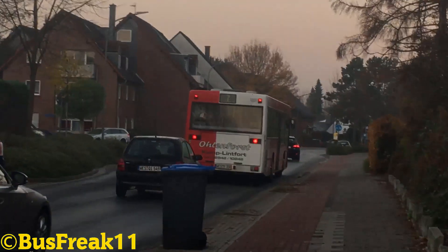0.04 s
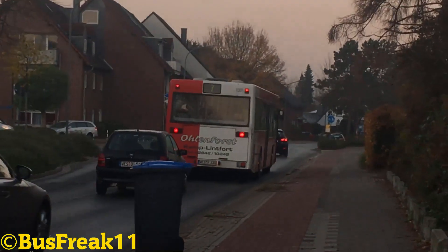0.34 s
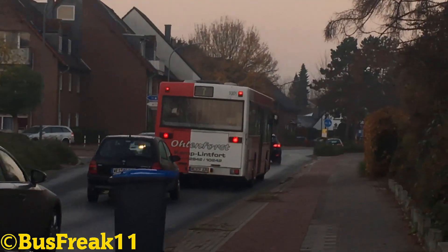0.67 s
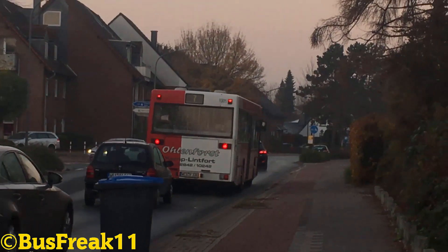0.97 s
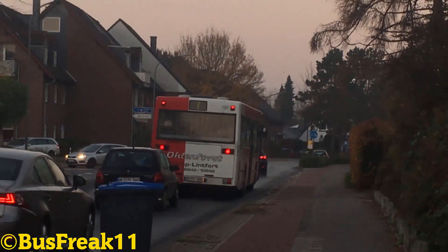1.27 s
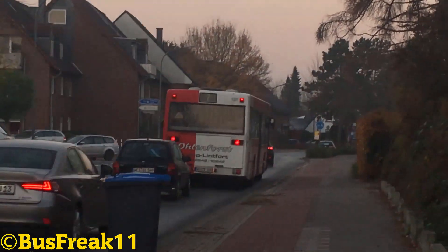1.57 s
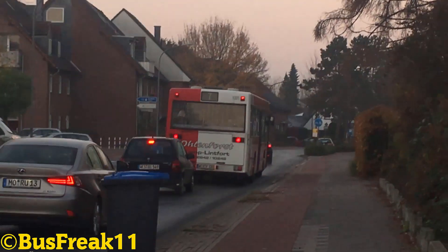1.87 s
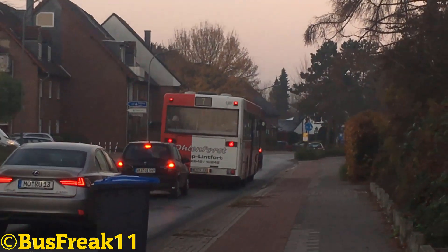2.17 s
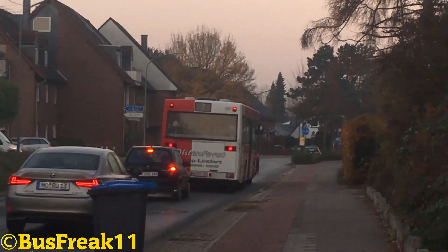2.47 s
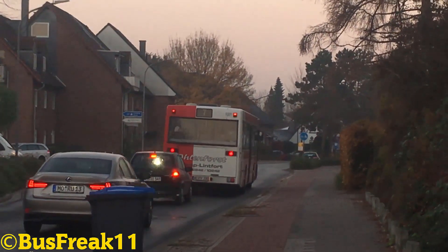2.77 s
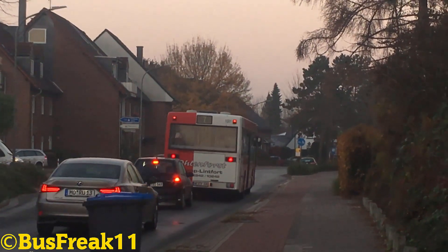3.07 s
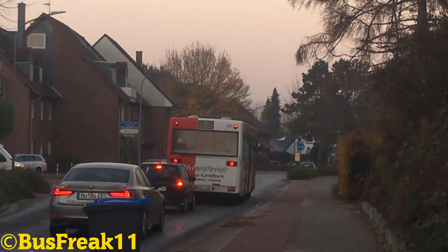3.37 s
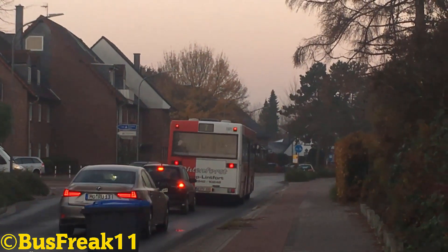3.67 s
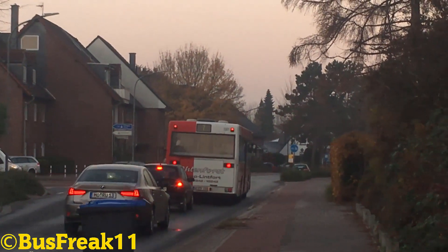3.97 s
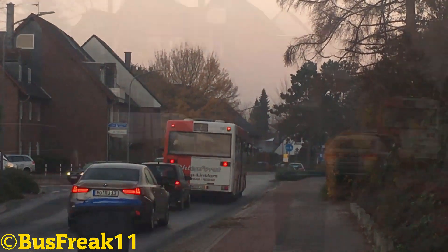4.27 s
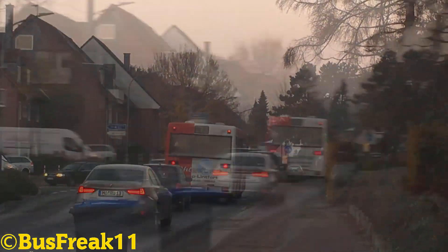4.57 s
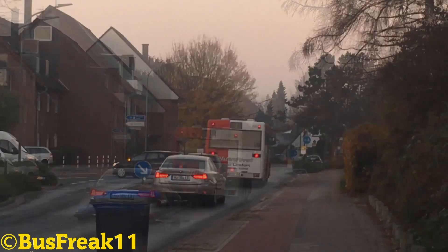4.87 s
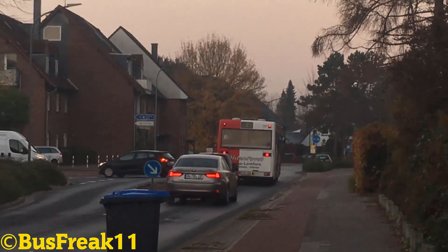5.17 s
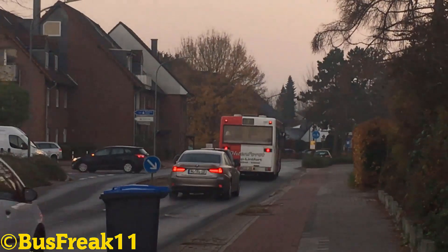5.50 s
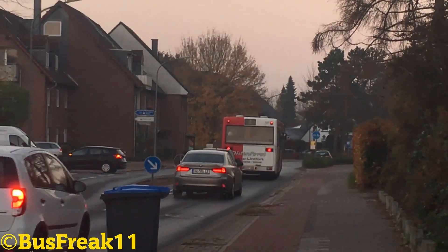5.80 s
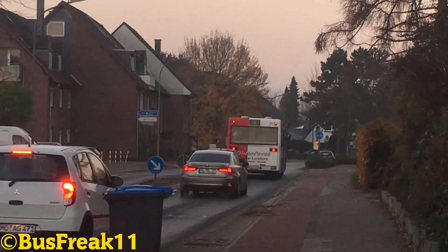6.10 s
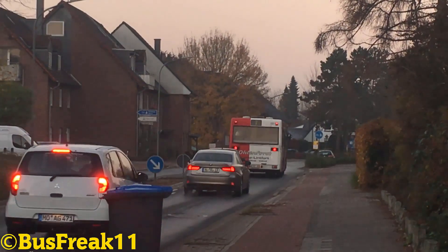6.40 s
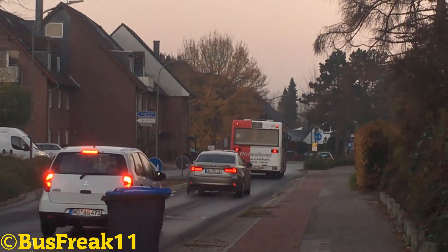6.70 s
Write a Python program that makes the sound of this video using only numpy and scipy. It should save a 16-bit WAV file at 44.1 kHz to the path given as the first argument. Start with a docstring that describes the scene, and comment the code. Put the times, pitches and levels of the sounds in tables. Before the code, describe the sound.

A diesel bus moves off along a street, its low engine rumbling and climbing, dipping for a gear change, then pulling again as it recedes. Cars drone past, their tyres hissing on damp asphalt and flicking up ticks of grit. After an abrupt cut, the bus is much louder, with a deep exhaust boom and a faint rising gear whine. It is heard from the pavement, with a short echo off the houses.

```python
"""A diesel city bus pulls away down a street of brick houses, heard from the pavement.
It revs up, changes gear and recedes; after an abrupt cut it pulls hard, exhaust booming, gears whining.
Its firings drive the exhaust tones and a rumble and knock that echo between the house fronts.
Cars follow on damp asphalt, their engines droning; tyres roar, hiss and flick up grit."""
import sys
import numpy as np
from scipy import signal
from scipy.fft import rfft, irfft, next_fast_len
from scipy.io import wavfile
from scipy.ndimage import uniform_filter1d

SR = 44100
rng = np.random.default_rng(int(sys.argv[2]) if len(sys.argv) > 2 else 0)


def transcribe(u):
    """Save the signal u as a 16-bit wav file named by the first command-line argument.

    u: samples, shape (n,) or (channels, n), limited to [-1, 1]; the rate is SR.
    q: integer samples, one column per channel.
    """
    v = np.clip(np.atleast_2d(u).T, -1, 1)
    q = np.round(v * 32767).astype(np.int16)
    wavfile.write(sys.argv[1], SR, q)


N = 302085
TIME = np.arange(N) / SR
CUT_S = 4.699

# spectrum of tyres rolling on asphalt: frequency_hz, relative_db
TYRE_ROAR = [(200, -13), (420, -2.5), (530, -2.5), (660, -3), (800, -2), (1030, 2), (1350, -2), (1750, -4),
             (2300, -12), (3200, -16.5), (6000, -42.5)]


def undb(db):
    """Decibels to gain."""
    return 10 ** (np.asarray(db) / 20)


def curves(table):
    """The columns of a table of timed rows, sample by sample."""
    times, *columns = np.transpose(table)
    return [np.interp(TIME, times, column) for column in columns]


def noise():
    """White noise of rms 1."""
    return rng.standard_normal(N)


def walk(rate_hz):
    """Random levels held 1 / rate_hz seconds and smoothed twice; spread near 1."""
    hold = max(int(SR / rate_hz), 2)
    steps = np.repeat(rng.standard_normal(N // hold + 1), hold)
    return 1.3 * uniform_filter1d(uniform_filter1d(steps, hold), hold)[:N]


def colour(x, spectrum):
    """Filter by (frequency_hz, relative_db) points and bring to rms 1."""
    size = next_fast_len(N + 8192, True)
    hz, db = np.transpose(spectrum)
    bins_hz = np.maximum(np.fft.rfftfreq(size, 1 / SR), 1)
    gain = undb(np.interp(np.log(bins_hz), np.log(hz), db, left=-60, right=-60))
    shaped = irfft(rfft(x, size) * gain, size)[:N]
    return shaped / shaped.std()


def tone(cycles):
    """A sine of rms 1 with a random starting phase."""
    return np.sqrt(2) * np.sin(2 * np.pi * (cycles + rng.random()))


def recede(age_s, near_db, fade_db_per_s, distant_db):
    """Level in dB of a source that draws away and sinks into the distant street."""
    return 20 * np.log10(np.hypot(undb(near_db - fade_db_per_s * age_s), undb(distant_db)))


def firings(revs, wobble=.003):
    """Count of firings so far; the crankshaft runs slightly unevenly."""
    hz, = curves(revs)
    return np.cumsum(hz * (1 + wobble * walk(25))) / SR


def pipe_gain(hz, centre_hz=215, width_hz=36, boost=0.49):
    """An engine order swells as it climbs through the tailpipe's resonance."""
    return 1 + boost / (1 + ((hz - centre_hz) / (width_hz / 2)) ** 2)


def exhaust(cycles, boom_db, octave_db, upper_db, flutter_db):
    """The silencer leaves a near-sine boom and its octave; weaker orders waver as reflections shift."""
    # engine orders and belt-driven auxiliaries: firing_multiple, relative_db
    orders = [(2.84, -1), (3, -3.5), (3.43, -0.5), (3.68, -4.5), (4, -11.5), (4.25, -4.5), (5, -5),
              (7, -16), (9, -16), (10.25, -19.5), (11.04, -27)]
    hz = np.gradient(cycles) * SR
    boom = undb(boom_db + flutter_db * walk(21.85)) * tone(cycles)
    octave = undb(boom_db + octave_db + flutter_db * walk(15)) * tone(2 * cycles)
    octave *= pipe_gain(2 * hz, centre_hz=145.1, width_hz=6.8, boost=1.3)
    upper = np.zeros(N)
    for multiple, db in orders:
        gain = undb(db + 2 * walk(7)) * pipe_gain(multiple * hz)
        upper += gain * tone(multiple * (cycles + 0.032 * walk(25)))
    return boom + octave + undb(upper_db) * upper


def combustion(cycles, scatter_db=3.0, decay_cycles=0.33, steady=0.72):
    """Each firing adds a noise burst of its own strength that dies within the cycle."""
    strength = undb(scatter_db * rng.standard_normal(4096))[cycles.astype(int) % 4096]
    return noise() * (steady + strength * np.exp(-(cycles % 1) / decay_cycles))


def house_fronts(x, t60_s=0.83, wet_db=-5):
    """Brick fronts scatter a tail that reaches the microphone behind the direct sound."""
    t = TIME[:SR]
    tail = rng.standard_normal(SR) * np.exp(-np.log(1000) * t / t60_s) * (t > .015)
    return x + undb(wet_db) * signal.fftconvolve(x, tail / np.linalg.norm(tail))[:N]


def droplets(per_s, spread_db):
    """Tiny clicks of water and grit leaving the tread, some louder than the rest."""
    size_db = np.minimum(spread_db * rng.exponential(size=N), 16)
    clicks = (rng.random(N) < per_s / SR) * noise() * undb(size_db)
    return clicks / clicks.std()


def traffic(cycles, age_s, levels, rumble_spectrum, spray_spectrum):
    """Engine rumble and diesel knock with the roar, hiss and spray of tyres, all receding."""
    # diesel knock radiated by the block: frequency_hz, relative_db
    knock_spectrum = [(350, -11), (450, -10), (560, 4.5), (680, 4), (830, -3), (1150, 6.5), (1500, -0.5),
                      (2000, -5), (2400, -7), (4000, -17), (7000, -28.5)]
    # tread hiss on the damp road: frequency_hz, relative_db
    hiss_spectrum = [(1200, 0.5), (2000, 1.5), (2800, 0), (3700, -1), (4200, -3.5), (5500, -5),
                     (7200, -11.5), (11000, -19.5)]
    db = {part: recede(age_s, *row) for part, row in levels.items()}
    bursts = house_fronts(combustion(cycles))
    rumble = undb(db["rumble"] + 1.6 * walk(22)) * colour(bursts, rumble_spectrum)
    knock = undb(db["knock"]) * colour(bursts, knock_spectrum)
    roar = undb(db["roar"] + 0.6 * walk(20)) * colour(noise(), TYRE_ROAR)
    hiss = undb(db["hiss"] + 0.68 * walk(24.96))
    hiss *= colour(noise() + 0.46 * droplets(per_s=900, spread_db=3.9), hiss_spectrum)
    spray = undb(db["spray"] + 0.35 * walk(40))
    spray *= colour(noise() + 0.66 * droplets(per_s=1200, spread_db=7), spray_spectrum)
    return rumble + knock + roar + hiss + spray


def moving_off(boom_fade_db_per_s=0.9):
    """The bus leaves the stop and changes up; its exhaust follows the load and dulls with distance."""
    # idle, climb through first gear, change up, slow climb: time_s, firing_hz, load_db
    revs = [(0, 51.52, 1), (.42, 51.46, 2), (1.85, 67.5, -3.5), (2.05, 66.1, -5), (2.3, 52.27, -10),
            (3, 53, -0.5), (4.7, 55.7, 5)]
    # each part of the traffic, heard from the pavement: near_db, fade_db_per_s, distant_db
    levels = {"rumble": (-39.5, 2.4, -47.5), "knock": (-53, 17, -58.5), "roar": (-47, 3.9, -51),
              "hiss": (-49, 4.53, -74.5), "spray": (-58.5, 4.24, -80)}
    # engine rumble leaving the stop: frequency_hz, relative_db
    rumble_spectrum = [(20, -20), (31, -12), (41, -3), (72, 4), (95, -2.5), (125, 2), (160, -3.5),
                       (185, -2), (235, -6), (300, -6.5), (360, -9.5), (430, -20), (900, -49)]
    # fine spray off the tyres: frequency_hz, relative_db
    spray_spectrum = [(4000, -16), (6500, 0.5), (7800, -1), (9000, 2), (10500, -3.5), (12000, -3),
                      (14200, -6), (15700, -7)]
    cycles = firings([(time_s, hz) for time_s, hz, _ in revs])
    _, load_db = curves(revs)
    boom_db = load_db - 43.5 - boom_fade_db_per_s * TIME
    upper_db = load_db + recede(TIME, near_db=-48.5, fade_db_per_s=6, distant_db=-60.5)
    tailpipe = exhaust(cycles, boom_db, octave_db=-9, upper_db=upper_db, flutter_db=3.0)
    return tailpipe + traffic(cycles, TIME, levels, rumble_spectrum, spray_spectrum)


def air(hiss_db=-72, sizzle_db=-74):
    """A faint steady hiss hangs over the street, with a narrow sizzle that flickers."""
    # high hiss of the air: frequency_hz, relative_db
    hiss_spectrum = [(3000, -11), (5000, 1), (6700, 4), (7700, -4), (9000, -1.5), (12000, -10), (15700, -2)]
    sizzle = colour(noise(), [(5150, -15), (5550, -2), (6000, -7), (6600, -18)])
    return undb(hiss_db) * colour(noise(), hiss_spectrum) + undb(sizzle_db + 2 * walk(20)) * sizzle


def car(nearest_s, half_length_s, firing_hz, rise_hz_per_s, engine_db, tyre_db):
    """A car swells and fades as it passes the microphone: tyres roar and four cylinders drone."""
    # the engine's first multiples of its firing rate: relative_db
    orders = [-2, -8, -12.5, -10.5]
    along = (TIME - nearest_s) / half_length_s
    hz = firing_hz + rise_hz_per_s * half_length_s * np.tanh(along)
    cycles = np.cumsum(hz * (1 + 0.02496 * walk(12))) / SR
    drone = sum(undb(db + 2.4 * walk(9.1)) * tone(k * cycles) for k, db in enumerate(orders, 1))
    roar = colour(noise(), TYRE_ROAR)
    return (undb(engine_db) * drone + undb(tyre_db) * roar) / (1 + along ** 2)


def hum(hz, db, flutter_db, wander_cycles):
    """One tone that can waver in level and phase: body drone or gear whine."""
    cycles = np.cumsum(hz * np.ones(N)) / SR
    return undb(db + flutter_db * walk(16)) * tone(cycles + wander_cycles * walk(20))


def load_swells():
    """The bus drones throatily for a moment as it takes up the load."""
    # swells of body drone: peak_s, half_length_s, pitch_hz, level_db
    swells = [(0.345, .27, 218, -40), (1.027, 0.11, 186, -44), (1.75, .35, 169.5, -50.5),
              (4.835, 0.022, 225, -44.5)]
    out = np.zeros(N)
    for peak_s, half_length_s, pitch_hz, level_db in swells:
        envelope = np.exp(-((TIME - peak_s) / half_length_s) ** 2)
        out += envelope * hum(pitch_hz, level_db, flutter_db=2.5, wander_cycles=.12)
    return out


def grit(decay_s=0.0011, log_width=0.27):
    """Single grains snap from under the tyres: short bright ticks."""
    # the loudest grains: start_s, peak_db, centre_hz
    grains = [(.2808, -41, 14500), (.4788, -40, 8400), (0.5588, -29.5, 3470), (1.092, -43, 8500),
              (1.3946, -40, 7000), (1.7979, -45, 7430), (1.9284, -45, 8000), (2.055, -52, 10980),
              (2.738, -55, 11000), (3.475, -54, 11000), (3.7394, -53, 10950), (3.91, -46, 11500),
              (4.4884, -54, 11060)]
    out, t = np.zeros(N), TIME[:512]
    bins_hz = np.maximum(np.fft.rfftfreq(len(t), 1 / SR), 1)
    for start_s, peak_db, centre_hz in grains:
        band = np.exp(-.5 * (np.log(bins_hz / centre_hz) / log_width) ** 2)
        tick = irfft(rfft(rng.standard_normal(len(t))) * band) * np.exp(-t / decay_s)
        start = int(start_s * SR)
        out[start:start + len(t)] += undb(peak_db) * tick / np.abs(tick).max()
    return out


def gearbox(age_s, start_hz=456, rise_hz_per_s=29.5, start_db=-65, swell_db_per_s=6):
    """Gear whine climbs and strengthens as the bus gathers speed."""
    hz = start_hz + rise_hz_per_s * age_s
    return hum(hz, start_db + swell_db_per_s * age_s, flutter_db=0, wander_cycles=.04)


def pulling_hard():
    """Under full load the exhaust booms and the gears whine while the traffic draws away."""
    # a quick flare of revs, then a steady climb: time_s, firing_hz
    revs = [(4.7, 60.55), (4.85, 64.7), (5.1, 67.13), (5.52, 70.34), (6, 71.4), (6.5, 75.2), (6.85, 78.15)]
    # strength of the exhaust boom: time_s, level_db
    boom_levels = [(4.72, -29), (4.76, -25), (4.8, -32.5), (5.06, -23.5), (5.08, -26), (5.37, -21.5),
                   (5.64, -22.5), (5.85, -21.5), (6.19, -21), (6.56, -19), (6.84, -26)]
    # each part of the traffic, heard from the pavement: near_db, fade_db_per_s, distant_db
    levels = {"rumble": (-40.5, 1.9, -44.5), "knock": (-43.5, 7.6, -48.5), "roar": (-42, 7.6, -48),
              "hiss": (-44.5, 8.7, -66), "spray": (-49, 9.6, -80)}
    # engine rumble under full load: frequency_hz, relative_db
    rumble_spectrum = [(20, -14), (32, -3), (48, 4), (100, 5.5), (130, 4), (170, 0), (220, -8), (290, -2),
                       (355, -2), (420, -13), (900, -25)]
    # fine spray off the tyres: frequency_hz, relative_db
    spray_spectrum = [(4000, -25), (6000, -3.5), (7100, -0.5), (7900, -2), (9300, 1), (11300, -2.5),
                      (13500, -6), (15700, -11)]
    cycles = firings(revs)
    age_s = np.maximum(TIME - CUT_S, 0)
    boom_db, = curves(boom_levels)
    upper_db = recede(age_s, near_db=-47.0, fade_db_per_s=6, distant_db=-63)
    tailpipe = exhaust(cycles, boom_db, octave_db=-22, upper_db=upper_db, flutter_db=.5)
    return tailpipe + gearbox(age_s) + traffic(cycles, age_s, levels, rumble_spectrum, spray_spectrum)


def scene():
    """From the pavement, in mono: the bus moves off among cars, then a hard cut to its louder pull."""
    # cars rolling by: nearest_s, half_length_s, firing_hz, rise_hz_per_s, engine_db, tyre_db
    passes = [(0.613, 1.3, 41.17, .5, -47, -61), (2.601, .65, 70.94, 6, -47.5, -52.5),
              (3.702, 0.52, 76.2, 0, -52, -51), (5.397, 1.7, 46.56, 4, -42.5, -65)]
    bus = np.where(TIME < CUT_S, moving_off(), pulling_hard()) + load_swells()
    cars = sum(car(*row) for row in passes)
    return (bus + cars + air() + grit())[None]


def record(dry, top_hz=15700):
    """The microphone housing ripples the treble; the top is cut off."""
    # narrow dips and peaks in the microphone's response: centre_hz, width_hz, gain_db
    ripples = [(4910, 460, -5.5), (5300, 380, -0.5), (10400, 600, -4.5), (11000, 600, 0.5)]
    for centre_hz, width_hz, gain_db in ripples:
        band = signal.lfilter(*signal.iirpeak(centre_hz, centre_hz / width_hz, fs=SR), dry)
        dry = dry + (undb(gain_db) - 1) * band
    return signal.sosfilt(signal.ellip(10, .2, 80, top_hz, fs=SR, output="sos"), dry)


dry = scene()
out = record(dry)
transcribe(out)
```